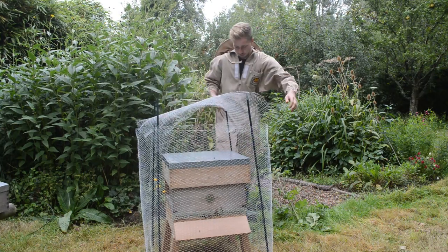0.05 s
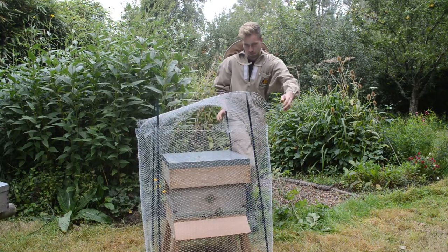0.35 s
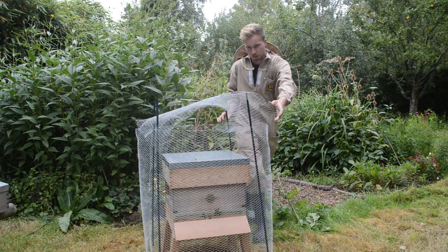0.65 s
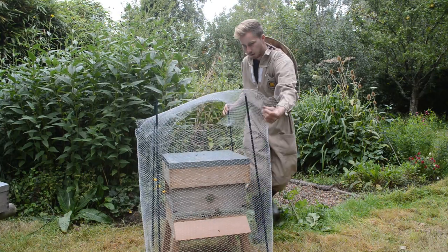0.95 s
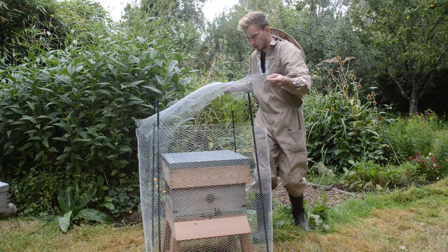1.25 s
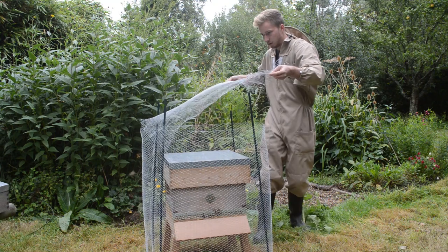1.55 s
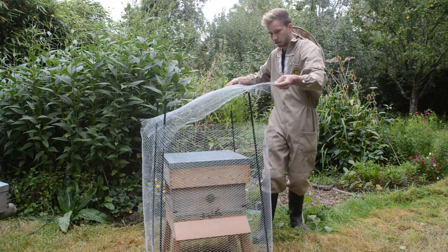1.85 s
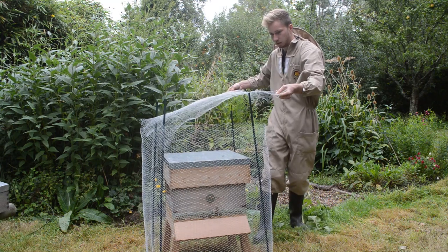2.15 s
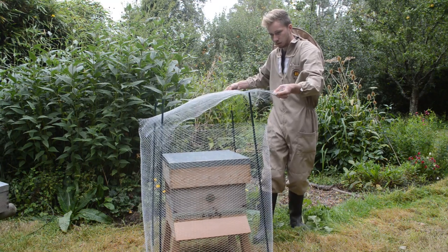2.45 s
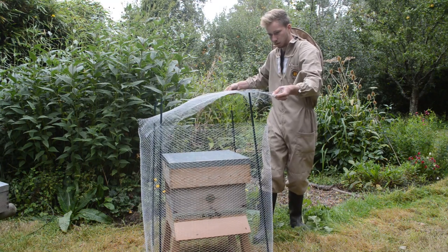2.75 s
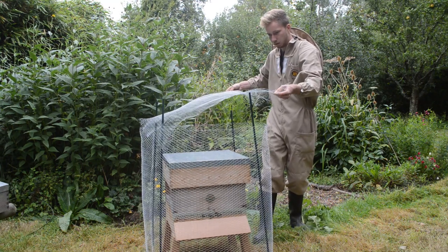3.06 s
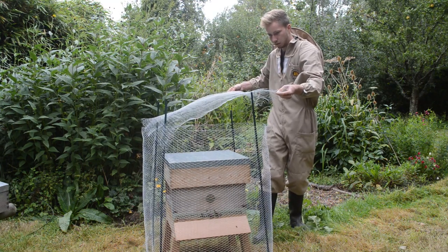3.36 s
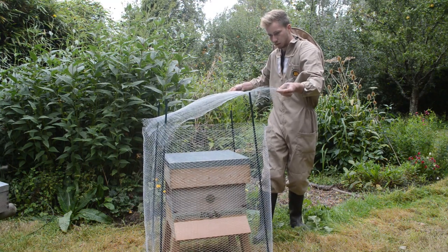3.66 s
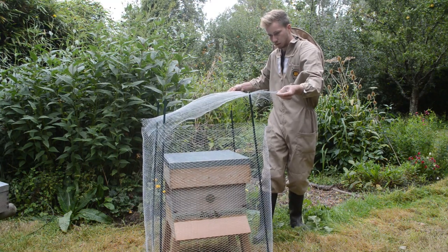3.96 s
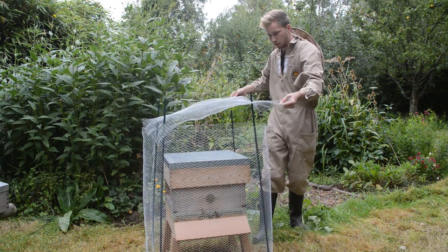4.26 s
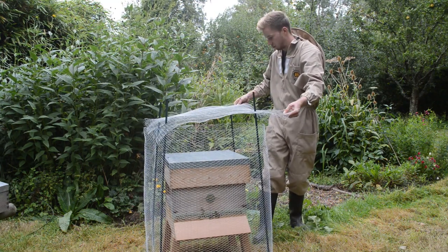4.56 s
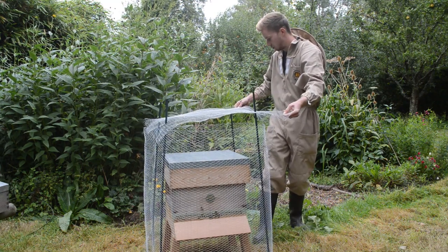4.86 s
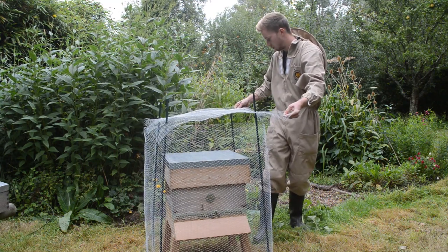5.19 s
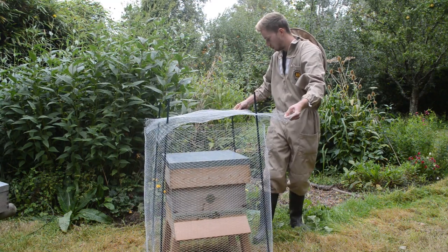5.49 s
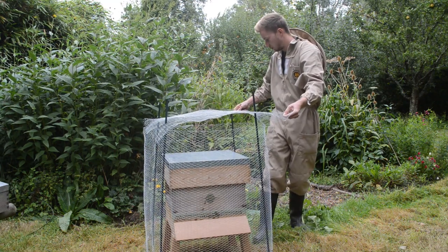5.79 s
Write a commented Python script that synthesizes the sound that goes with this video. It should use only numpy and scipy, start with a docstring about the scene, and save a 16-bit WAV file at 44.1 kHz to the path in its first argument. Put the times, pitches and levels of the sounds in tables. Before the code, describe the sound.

A microphone beside a garden beehive picks up a continuous, wavering buzz, with individual bees passing close. Early on, low puffs of wind bump the microphone as someone takes a few dull steps in grass and pulls rustling mesh, with tiny snags and swishes of cloth. Afterwards the mesh stirs only lightly and the wind bumps twice more. Farther off, leaves hiss, a motor hums low and a small bird chirps faintly.

```python
"""Honeybees around a wooden garden hive, their wingbeats buzzing in flight and fanning at the entrance.
Near the microphone a keeper in overalls steps through the grass and drags a fine net over its poles,
its threads catching and slipping, then stands and holds it. A breeze nudges the microphone in puffs;
farther off, leaves hiss, a motor hums and a small bird chips faintly."""
import sys
import numpy as np
from scipy import signal
from scipy.fft import rfft, irfft, next_fast_len
from scipy.io import wavfile
from scipy.ndimage import map_coordinates

SR = 44100
rng = np.random.default_rng(int(sys.argv[2]) if len(sys.argv) > 2 else 0)


def wrap_up_sound(samples):
    """Save the sound to the file named by the first command line argument, as 16-bit audio."""
    columns = np.atleast_2d(samples).T
    # keep every value between -1 and 1, then stretch to whole-number steps
    tamed = np.clip(columns, -1, 1)
    steps = np.round(tamed * 32767).astype(np.int16)
    wavfile.write(sys.argv[1], SR, steps)


N = 265878


def amp(db):
    """Decibels to gain."""
    return 10 ** (np.asarray(db) / 20)

def unit(x):
    """x at rms 1."""
    return x / np.sqrt(np.mean(x ** 2) + 1e-20)

def clock():
    """The time of every sample."""
    return np.arange(N) / SR

def curves(rows):
    """One value per sample for each column after the time."""
    times, *columns = np.transpose(rows)
    return [np.interp(clock(), times, column) for column in columns]

def wobble(rate):
    """A smooth random curve, rate knots a second."""
    coarse = np.linspace(0, N / SR, 4096)
    knots = rng.standard_normal(2048)
    return np.interp(clock(), coarse, map_coordinates(knots, [coarse * rate], mode="mirror"))

def filtered(x, gain):
    """x times a gain that depends on frequency."""
    size = next_fast_len(N + SR // 2)
    hz = np.fft.rfftfreq(size, 1 / SR) + 1e-3
    return irfft(rfft(x, size) * gain(hz), size)[:N]

def coloured(x, points):
    """x through a (Hz, dB) spectrum, at rms 1."""
    point_hz, db = np.transpose(points)
    return unit(filtered(x, lambda hz: amp(np.interp(np.log(hz), np.log(point_hz), db))))

def band(centre_hz, octaves):
    """Noise of rms 1 in a bell-shaped band."""
    noise = rng.standard_normal(N)
    return unit(filtered(noise, lambda hz: np.exp(-.25 * (np.log2(hz / centre_hz) / octaves) ** 2)))

def swell(peak_s, width_s):
    """A bell-shaped rise and fall; width_s is its standard deviation."""
    return np.exp(-.5 * ((clock() - peak_s) / width_s) ** 2)

def thud(start_s, db, hz, t60, top_harmonic=3):
    """A muffled, dying tone."""
    age = np.maximum(clock() - start_s, 0)
    onset = 1 - np.exp(-(age * hz / .14) ** 2)  # the deeper the thud, the softer its start
    push = amp(db - 60 * age / t60) * np.sin(2 * np.pi * hz * age) * onset
    return -filtered(push, lambda f: 1 / (1 + (f / (top_harmonic * hz)) ** 10))

def bees(harmonics, beat_hz, spread, wander, flutter, roam_db, count):
    """Each bee repeats one wing stroke at its own drifting rate, louder as it comes near."""
    order, db = np.transpose(harmonics)
    cycle = np.linspace(0, 1, 513)
    buzz = np.zeros(N)
    for detune in np.linspace(-1, 1, count):
        phases = rng.random((len(db), 1))
        stroke = amp(db) @ np.sin(2 * np.pi * (np.round(order)[:, None] * cycle + phases))
        pitch = beat_hz * (1 + spread * detune + wander * wobble(2.5) + flutter * wobble(22))
        nearness = amp(roam_db * (wobble(1.68) + 1.02 * wobble(9)))
        buzz += unit(nearness) * np.interp(np.cumsum(pitch) / SR % 1, cycle, stroke)
    return unit(buzz)


# Wing strokes in flight and when fanning. Each row: multiple of the wingbeat, relative level in dB.
FLIGHT_STROKE = [(1, -4), (2, -0.5), (3, -9.5), (4, -12.5), (5, -12), (6, -14.5), (7, -23), (8, -23.5),
                 (9, -30), (10, -19.5), (11, -19.5), (12, -28), (13, -21)]
FANNING_STROKE = [(1, -4), (2, 0), (3, -17.5), (4, -10.5), (5, -9), (6, -19)]
# The bees nearest the microphone. Each row: time in seconds, mean wingbeat in Hz, level in dB.
CLOSE_BEES = [(0, 262.3, -69), (.85, 257.2, -66.5), (1.35, 261.4, -65.5), (1.9, 253.4, -64.5),
              (2.4, 255.3, -63.5), (2.7, 262, -65.5), (3.0, 255.8, -70), (3.25, 265.8, -66.5),
              (3.65, 259.7, -61.5), (4.0, 246.6, -64.5), (4.35, 254.2, -65.5), (5.0, 256.6, -67),
              (5.45, 249.3, -66.5), (6.0, 258.7, -65)]
# Wings sound brighter close up. Each row: frequency in Hz, relative gain in dB.
CLOSE_COLOUR = [(250, -3.5), (500, -0.5), (780, 1.5), (1500, 2), (3500, 2)]

def hive():
    """A haze of wings in flight, a few bees close by, and slower fanners on the landing board."""
    swarm = bees(FLIGHT_STROKE, 250.56, spread=.075, wander=.04, flutter=.01, roam_db=1.64, count=18)
    close_hz, close_db = curves(CLOSE_BEES)
    close = bees(FLIGHT_STROKE, close_hz, spread=.034, wander=.028, flutter=.011, roam_db=2.5, count=5)
    fanning = bees(FANNING_STROKE, 202.05, spread=.03, wander=.025, flutter=.00987, roam_db=5, count=6)
    swarm_db = -63.5 + 1.3 * wobble(1.86)
    return amp(swarm_db) * swarm + amp(close_db) * coloured(close, CLOSE_COLOUR) + amp(-67) * fanning


# The air all round the garden. Each row: frequency in Hz, relative noise density in dB.
AIR_SPECTRUM = [(30, 13.5), (70, 8.5), (110, 2.5), (160, 0), (300, 0.36), (620, -4.5), (1200, -9.5),
                (2000, -13.5), (3200, -16.5), (5000, -21.5), (8000, -24), (12000, -27), (15700, -30.5)]

def garden_air():
    """Distant leaves blend into an even wash."""
    return amp(-55 + .41 * wobble(2.6)) * coloured(rng.standard_normal(N), AIR_SPECTRUM)


# A motor a long way off. Each row: frequency in Hz, base level in dB.
MOTOR_TONES = [(56, -58.5), (99, -73.5), (113, -71.5)]
# Its slow rise and fall. Each row: time in seconds, gain in dB.
MOTOR_GAIN = [(0, 4.5), (2.5, -0.5), (3.6, 1.5), (4.3, 5), (5.2, 2), (6, 5)]

def far_motor():
    """A faint hum of low tones, each wavering in pitch and level."""
    hum = np.zeros(N)
    for hz, db in MOTOR_TONES:
        level = np.sqrt(2) * amp(db + 1.7 * wobble(2.86))
        pitch = hz * (1 + .00967 * wobble(3.97))
        hum += level * np.sin(2 * np.pi * np.cumsum(pitch) / SR)
    return hum * amp(curves(MOTOR_GAIN)[0])


# Gusts on the microphone. Each row: peak time and width in seconds, strength in dB against the calm.
MIC_GUSTS = [(0.114, 0.25, 11.5), (0.83, 0.17, 14), (1.45, 0.39, 2), (3.03, 0.054, -6), (3.895, 0.041, 7.5),
             (5.293, 0.22, -1.5)]

def breeze(linger_s=.029, eddy_share=.75):
    """Each gust stirs quick eddies on the microphone, and slow pressure swings that linger after it."""
    gusts = sum(amp(db) * swell(s, width) for s, width, db in MIC_GUSTS)
    pole = np.exp(-1 / (linger_s * SR))
    lingering = signal.lfilter([1 - pole], [1, -pole], gusts)
    sway_spectrum = [(.5, -32), (2, -5.5), (4, -1.5), (7, -3), (12, -12.5), (22, -35), (50, -51),
                     (150, -120)]
    eddy_spectrum = [(12, 6), (22, 3), (40, -10.5), (70, -17.5), (130, -34.5), (400, -64)]
    sway = amp(-36) * (1 + lingering) * coloured(rng.standard_normal(N), sway_spectrum)
    eddies = amp(-47.5) * (1 + eddy_share * gusts) * coloured(rng.standard_normal(N), eddy_spectrum)
    return signal.windows.tukey(N, .02) * (sway + eddies)


# Steps round the hive. Each row: peak time and width in seconds, centre in Hz, scuff and crunch in dB.
BOOT_SCUFFS = [(0.003, 0.021, 78.6, -38, -59), (0.883, 0.043, 242, -59, -72), (1.106, 0.003, 400, -44, -64),
               (1.184, 0.099, 176, -56, -71), (1.284, 0.035, 420, -63.5, -76)]

def boot_scuffs():
    """Boots scuff dully through the grass, crushed stalks crunching above."""
    crunch = band(910, octaves=.78)
    return sum(swell(s, width) * (amp(db) * band(hz, octaves=.68) + amp(crunch_db) * crunch)
               for s, width, hz, db, crunch_db in BOOT_SCUFFS)


# One long pull of the net over its poles. Each row: time in seconds, base level in dB.
NET_PULL = [(0.02, -58), (0.078, -62), (0.104, -66), (0.688, -68.5), (0.778, -65), (.93, -65.5),
            (1.09, -64.5), (1.245, -63.5), (1.496, -66.5), (1.8, -75.5)]
# Small tugs at the held net. Each row: peak time and width in seconds, level in dB.
NET_TUGS = [(2.017, 0.086, -65.5), (3.35, 0.068, -67.5), (3.676, 0.065, -68), (3.9, 0.11, -66),
            (5.35, 0.099, -71), (5.972, 0.18, -64.5)]
# The mesh heard close up. Each row: frequency in Hz, relative noise density in dB.
MESH_SPECTRUM = [(300, 13.5), (900, 8.5), (1600, 5), (2800, 3), (4500, -0.5), (8000, -3.5), (12000, -7),
                 (15700, -9.5)]

def net_rustle(crinkles_per_s=45, pull_gain_db=7, settle_db_per_s=33, held_db=-77):
    """Threads catch and slip in countless tiny grains, and stiff folds flick over in crinkles."""
    grain_db = 2.5 * rng.standard_normal(N // 32 + 1).repeat(32)[:N]
    grains = rng.standard_normal(N) * amp(grain_db)
    crinkles = (rng.random(N) < crinkles_per_s / SR) * rng.uniform(-1, 1, N)
    rustle = coloured(unit(grains) + amp(-11.5) * unit(crinkles), MESH_SPECTRUM)
    since_pull = np.maximum(clock() - NET_PULL[-1][0], 0)
    pull = amp(curves(NET_PULL)[0] + pull_gain_db - settle_db_per_s * since_pull)
    tug_power = sum((amp(db) * swell(s, width)) ** 2 for s, width, db in NET_TUGS)
    motion = np.sqrt(pull ** 2 + tug_power + amp(held_db) ** 2)
    return motion * amp(.57 * wobble(25)) * rustle


# The keeper's clothes, nearby. Each row: peak time and width in seconds, centre in Hz, level in dB.
CLOTH_SWISHES = [(0.073, 0.013, 9400, -70), (0.12, 0.19, 2480, -67), (0.806, 0.12, 7300, -66),
                 (1.227, 0.04, 3540, -65.5), (1.24, 0.04, 11500, -70), (4.853, 0.016, 6000, -69),
                 (4.864, 0.0079, 3380, -64.5), (4.865, 0.0074, 1500, -65)]

def overalls():
    """Cloth brushes the mesh in narrow bands of hiss."""
    return sum(amp(db) * swell(s, width) * band(hz, octaves=.3) for s, width, hz, db in CLOTH_SWISHES)


# Snags in the net. Each row: start in seconds, level in dB, pitch in Hz.
SNAG_TICKS = [(.367, -45, 7900), (.444, -41, 11000), (.92, -41, 12500), (1.3757, -37, 4100),
              (1.428, -44, 10000), (1.661, -51, 7400), (2.374, -41.5, 7400), (2.537, -40.5, 8600),
              (5.596, -40, 10630)]

def net_snags(ring_cycles=6.8):
    """The mesh snaps free with a tick that falls 60 dB in ring_cycles."""
    sound = np.zeros(N)
    for s, db, hz in SNAG_TICKS:
        age = np.maximum(clock() - s, 0)
        sound += amp(db - 60 * age * hz / ring_cycles) * np.sin(2 * np.pi * hz * age)
    return sound


# Low puffs of wind on the microphone, and higher boot knocks nearby.
# Each row: start in seconds, strength in dB, pitch in Hz, t60 in seconds.
PUFFS_AND_KNOCKS = [(0.432, -26.5, 32.8, 0.51), (0.612, -30, 42, 0.16), (0.711, -22, 37.4, 0.17),
                    (.875, -43, 262, 0.079), (0.929, -30.5, 45.2, 0.14), (1.105, -34, 278, 0.036),
                    (1.161, -36.5, 423, 0.015), (1.191, -35, 230, 0.022), (1.219, -36, 260, .018),
                    (1.286, -37.5, 432, 0.02), (2.95, -25, 28.48, 0.3), (3.023, -36, 29.2, 0.18),
                    (3.1, -31.5, 38, 0.076), (4.409, -15.5, 95, 0.013), (4.425, -34, 52, .09)]
PUFF_TOP_HZ = 100

def wind_puffs():
    """Dull low puffs of wind push on the microphone."""
    return sum(thud(s, db, hz, t60) for s, db, hz, t60 in PUFFS_AND_KNOCKS if hz < PUFF_TOP_HZ)

def boot_knocks():
    """A boot lands with small, quickly damped knocks."""
    return sum(thud(s, db, hz, t60) for s, db, hz, t60 in PUFFS_AND_KNOCKS if hz >= PUFF_TOP_HZ)


# Bees passing the microphone. Each row: peak time and width in seconds, wingbeat in Hz, level in dB.
FLYBYS = [(0.84, 0.08, 252, -59), (1.326, 0.113, 265, -65), (2.094, 0.122, 262, -62.5),
          (2.998, 0.063, 254, -61), (3.14, 0.04, 282.6, -64.5), (3.3, 0.1, 267, -66),
          (3.649, 0.069, 272.8, -67), (3.921, 0.089, 239.4, -64), (4.92, 0.11, 261, -67.5),
          (5.08, .06, 255.8, -62.5), (5.702, 0.041, 251.4, -68), (5.949, 0.087, 254.5, -69)]

def passing_bees(pitch_shift=.012):
    """Single bees swell out of the swarm and sink in pitch as they go by."""
    sound = np.zeros(N)
    for s, width, hz, db in FLYBYS:
        pitch = hz * (1 - pitch_shift * np.tanh((clock() - s) / width))
        bee = bees(FLIGHT_STROKE, pitch, spread=0, wander=.006, flutter=.008, roam_db=3.5, count=1)
        sound += amp(db) * swell(s, width) * bee
    return sound


# The net at ground level. Each row: peak time and width in seconds, centre in Hz, level in dB.
HEM_SCRAPES = [(0.912, 0.17, 1120, -63), (1.17, 0.075, 895, -61), (1.306, 0.045, 604, -69),
               (1.472, 0.048, 1093, -63.5)]

def net_hem(catch_db=2.5):
    """The hem scrapes over the ground, catching unevenly."""
    catching = unit(amp(catch_db * wobble(69.5)))
    return catching * sum(amp(db) * swell(s, width) * band(hz, octaves=.38)
                          for s, width, hz, db in HEM_SCRAPES)


# A small bird off in the foliage. Each row: peak time and half-length in seconds,
# start and end pitch in Hz, level in dB, phase blur in radians.
BIRD_NOTES = [(2.152, 0.043, 4340, 4230, -76, .4), (2.377, 0.03, 4290, 4240, -66, .25),
              (3.34, 0.083, 3330, 3260, -71.5, 1.2), (4.813, 0.029, 3725, 3940, -68.5, 1),
              (5.43, 0.026, 4350, 3800, -64, 1.2), (5.962, 0.032, 4240, 3800, -64.5, 1.4)]

def bird(twitter_start_s=4.45, twitter_rise_s=.15):
    """Short sliding whistles blurred by the foliage, and a thin twitter that sets in farther off."""
    whistles = np.zeros(N)
    for s, half, start_hz, end_hz, db, blur in BIRD_NOTES:
        pitch = np.interp(clock(), [s - half, s + half], [start_hz, end_hz])
        scatter = blur * wobble(400)  # many leafy paths smear the phase
        level = amp(db + wobble(90)) * swell(s, half / 2)
        whistles += level * np.sin(2 * np.pi * np.cumsum(pitch) / SR + scatter)
    fade_in = np.clip((clock() - twitter_start_s) / twitter_rise_s, 0, 1)
    twitter = amp(-76.5 + 1.98 * wobble(25)) * band(3660, octaves=.17)
    return whistles + fade_in * twitter


def scene():
    """One microphone beside the hive, in the open air."""
    buzz = hive() + passing_bees()
    keeper = net_rustle() + net_hem() + net_snags() + overalls() + boot_scuffs() + boot_knocks()
    surroundings = bird() + breeze() + wind_puffs() + garden_air() + far_motor()
    return (buzz + keeper + surroundings)[None]

def record(dry):
    """The microphone's single channel holds nothing above 15720 Hz."""
    return filtered(dry[0], lambda hz: hz < 15720)[None]


dry = scene()
out = record(dry)
wrap_up_sound(out)
```